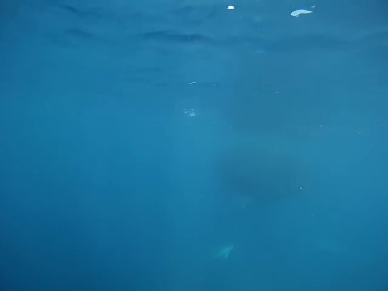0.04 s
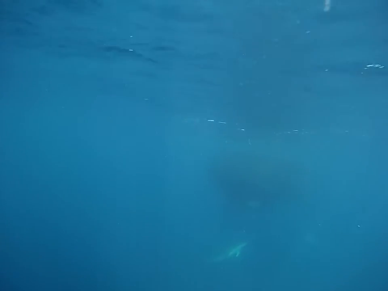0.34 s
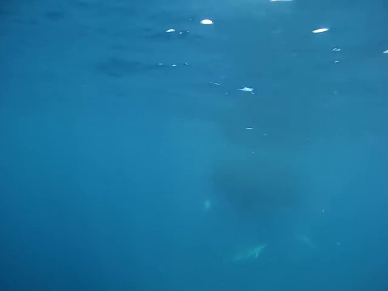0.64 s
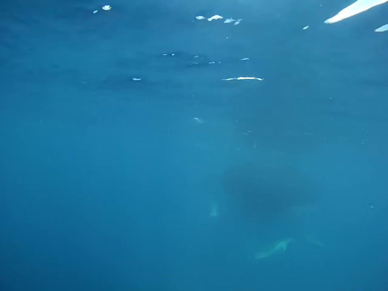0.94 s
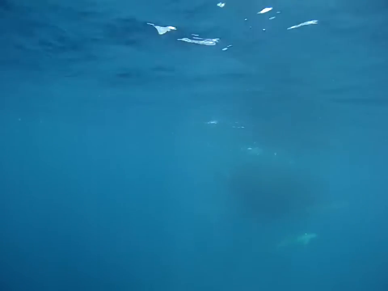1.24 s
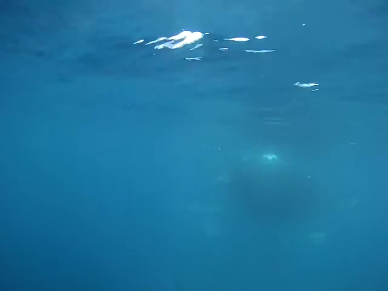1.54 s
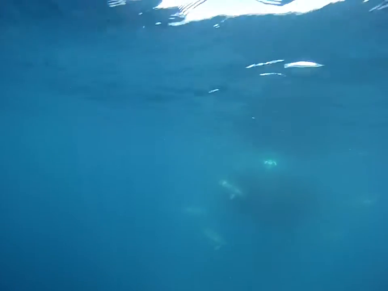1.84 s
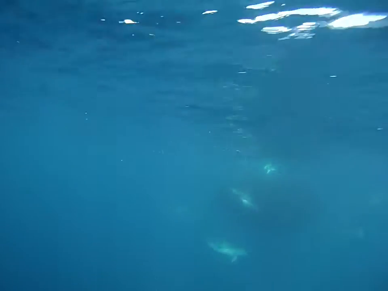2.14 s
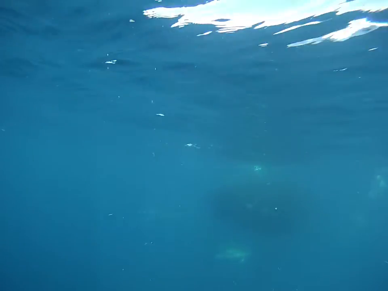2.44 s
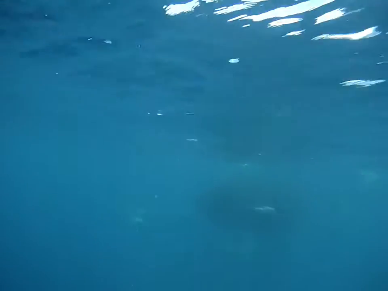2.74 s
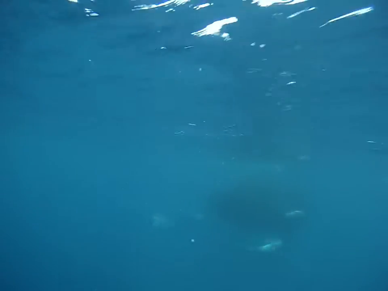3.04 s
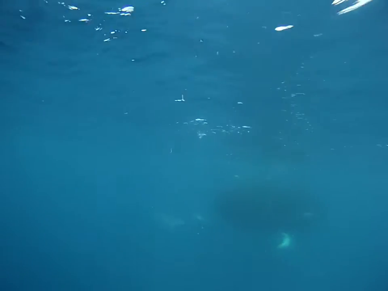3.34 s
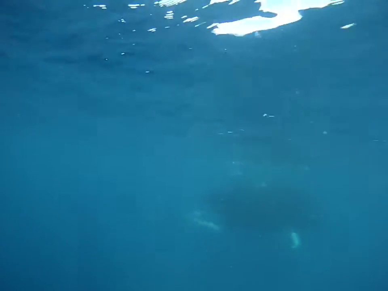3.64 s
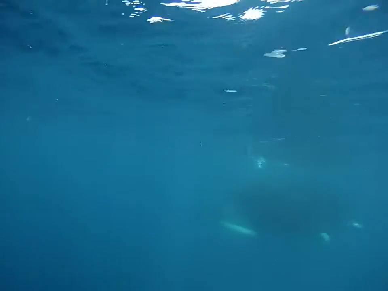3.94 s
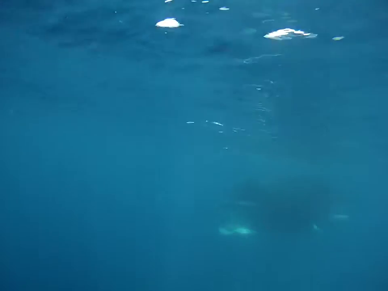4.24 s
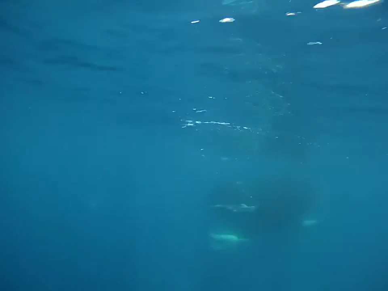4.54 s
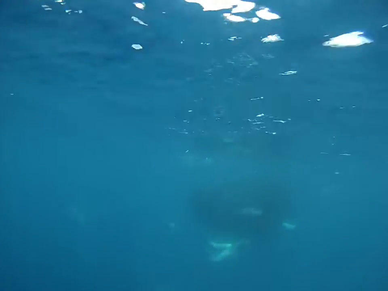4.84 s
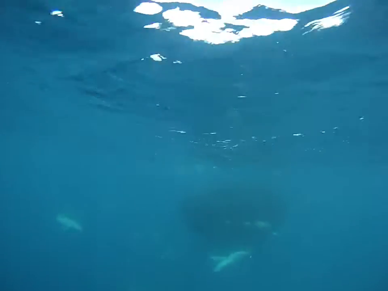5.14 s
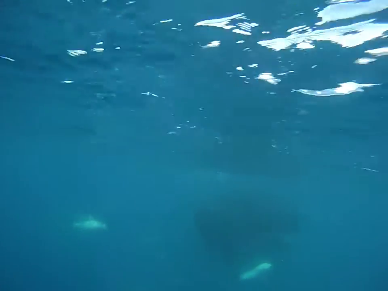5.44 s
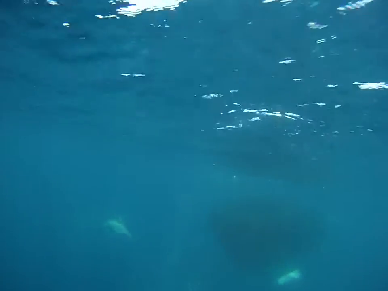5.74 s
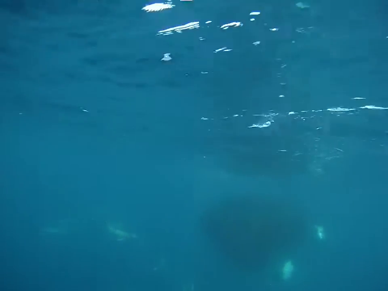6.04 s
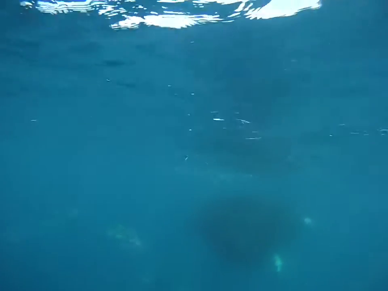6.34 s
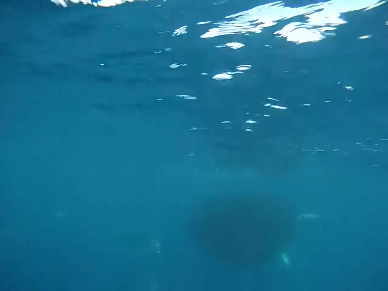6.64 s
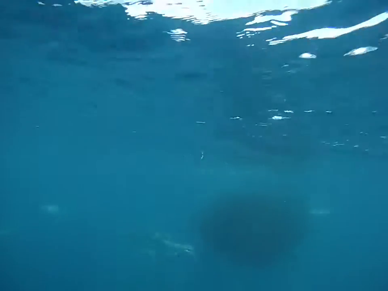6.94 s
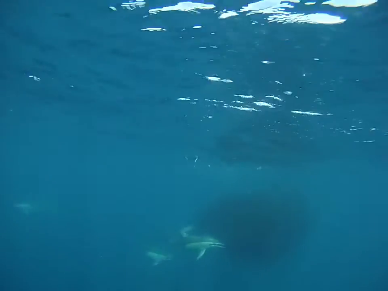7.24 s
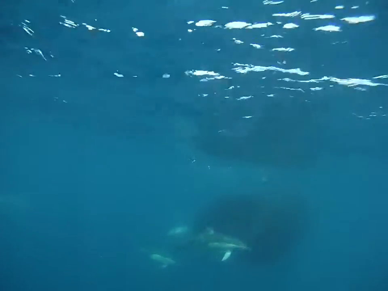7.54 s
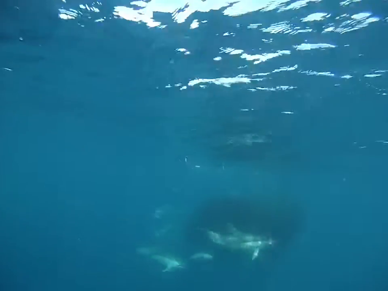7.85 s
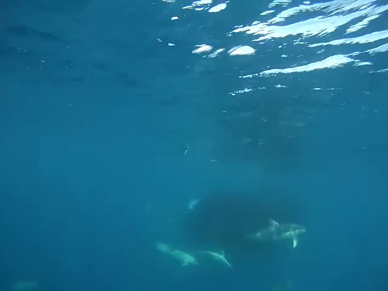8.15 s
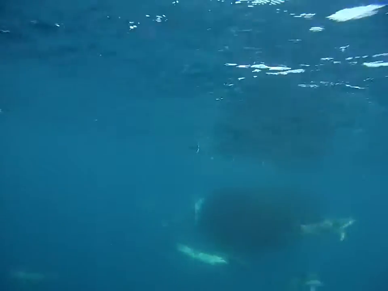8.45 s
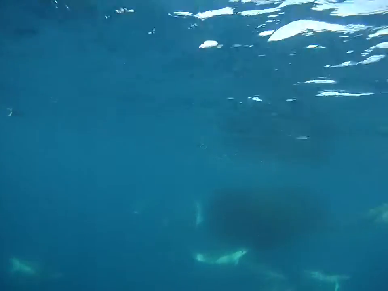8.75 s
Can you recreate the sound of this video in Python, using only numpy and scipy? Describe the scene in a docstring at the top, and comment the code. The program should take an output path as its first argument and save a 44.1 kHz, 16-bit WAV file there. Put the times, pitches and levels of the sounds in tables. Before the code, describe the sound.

Underwater, a boat engine rumbles and clatters as bubbles plop, dolphins faintly whistle and click, and a hiss sets in near the end.

```python
"""Under the sea, two boat engines idle, knocking through the hull, while tiny far-off bubbles fizz.
First, bubbles plop and gurgle near a camera housing, and a passing dolphin gives one long whistle.
From about 1 s the dolphins send out sonar clicks; then come short whistles, squeals, a squawk and
buzzes (clicks so fast that they blend). At 7.4 s a loud hiss sets in at once, most likely a propeller
starting to churn the water, and a few sharp cracks follow."""
import sys
import numpy as np
from scipy import signal
from scipy.fft import rfft, irfft
from scipy.io import wavfile
from scipy.ndimage import uniform_filter1d

SR = 44100
rng = np.random.default_rng(int(sys.argv[2]) if len(sys.argv) > 2 else 0)


def materialize(psi):
    """Save the field psi as 16-bit PCM at rate SR to the path in sys.argv[1].

    A 1-D psi becomes a single channel; in a 2-D psi each row is a channel.
    """
    bounded = np.clip(np.atleast_2d(psi).T, -1, 1)
    quanta = np.round(bounded * 32767).astype(np.int16)
    wavfile.write(sys.argv[1], SR, quanta)


N = 396900
TIME = np.arange(N) / SR

# Levels in the tables are relative: the functions turn them up or down further.
# How loud the far fizz, engine clatter, low rumble and near gurgle are as time goes on.
# Each row: time in seconds, level in dB.
FIZZ_LEVEL = [(1.5, -55), (2.4, -57), (3.1, -53.5), (5.55, -55.5), (6.1, -54), (7.2, -57.5)]
CLATTER_LEVEL = [(0.0, -28), (1.73, -28.5), (2.15, -32), (3.18, -29), (7.24, -31.5), (7.79, -29.5)]
RUMBLE_LEVEL = [(0.0, -37), (1.7, -34.5), (2.2, -39.5), (2.78, -33), (3.55, -40.5), (4.15, -33.5),
                (4.8, -37), (5.5, -33), (6.3, -38), (7.55, -35), (9.0, -35.5)]
GURGLE_LEVEL = [(0, -51), (.8, -65), (1.15, -45), (2.05, -46.5)]
# The colour of each sound: how strong its lows and highs are. Each row: frequency in Hz, level in dB.
FIZZ_COLOUR = [(2500, -3), (3500, 3.5), (4500, -8), (7000, -11), (8600, -16.5), (10200, -12.5),
               (13000, -21), (15500, -30)]
HULL_COLOUR = [(140, -17), (250, -13), (400, -7), (540, -7), (640, 2), (780, -15), (900, -16), (1060, -30),
               (1300, -26), (1530, -23), (1800, -27.5), (2300, -37), (4500, -66.5)]
RUMBLE_COLOUR = [(16, -15.5), (30, 2), (40, -6), (50, 5), (62, -8), (74, -3), (90, -12.5), (130, -25)]
CRACK_COLOUR = [(3000, 12), (7000, 3), (15000, -44)]
CHURN_COLOUR = [(1050, -7.5), (1300, 8.5), (2000, 4), (2400, -7.5), (2900, -6.5), (3200, 3.5), (3600, 3.5),
                (4500, -10), (7100, -8.5), (8700, -15), (9800, -11), (10700, -26), (13300, -35),
                (14300, -30), (15500, -39)]
SONAR_COLOUR = [(3000, -32), (7000, -10.5), (8700, -11.5), (10200, 1.5), (12500, -2), (14000, -15)]
BUZZ_COLOUR = [(2500, -17), (4000, 2), (4900, -4), (7200, 5), (8600, -8), (10200, 4.5), (14000, -7)]
SQUAWK_COLOUR = [(1900, 19.5), (2600, 3), (4600, -1), (5800, 6), (6450, -9), (7100, 5), (8200, -16),
                 (10500, -10)]
WHISTLE_COLOUR = [(6000, -5.5), (7200, 10), (8700, -5), (10300, 4), (11500, -10), (12800, -2)]  # the housing favours some pitches
# Narrow bands that the hull and the housing boost or cut.
# Each row: centre in Hz, width in Hz, boost in dB (below 0 cuts).
HULL_BANDS = [(253.7, 29.3, 6.5), (657, 39, 2), (1285, 99, 10), (1532, 41, -20), (2015, 46, 11)]
HOUSING_BANDS = [(1587, 67, -28), (3970, 170, 4), (4800, 110, -2), (5150, 330, 7.5), (6230, 1000, -12),
                 (6900, 1350, 13), (8650, 440, -16)]
# The two engines. Each row: firings per second, level in dB.
ENGINES = [(50.6, 0), (47.8, -4)]
# Sharp cracks in the water. Each row: time in seconds, peak level in dB.
CRACKS = [(.0613, -40), (1.4222, -40), (7.68, -24), (7.921, -23), (8.116, -27), (8.5053, -26)]
# Bubbles that plop, bubbles that snap as they pinch off, and water thumping the housing.
# Each row: start in seconds, starting pitch in Hz, peak level in dB.
PLOPS = [(.061, 8440, -46), (.096, 846, -11.5), (.113, 1890, -23.5), (.115, 1324, -20), (.977, 706, -10.5),
         (.996, 830, -13), (1.0145, 1897, -10.5), (1.037, 995, -19.5), (1.052, 2900, -37),
         (1.1348, 1300, -16), (1.136, 830, -17.5), (1.141, 2570, -33), (1.499, 8000, -50),
         (1.794, 870, -18.5)]
SNAPS = [(.1795, 2920, -36), (.8659, 3300, -28.5), (1.013, 2300, -21.5), (1.124, 2650, -27),
         (1.2934, 6730, -46), (1.723, 2750, -33), (1.7921, 1410, -10), (1.864, 2210, -22.5),
         (3.292, 2630, -30), (3.394, 2640, -25)]
THUMPS = [(.31, 52.5, -9.5), (.346, 52, -12), (.976, 266, -10), (.977, 810, 0), (5.302, 190, -12.5),
          (5.303, 63.6, -4.5), (5.345, 60, -11)]
# Runs of sonar clicks. Each row: first and last click in seconds, average clicks per second,
# speed-up (below 0 slows down), moment of best aim in seconds, peak level in dB.
SONAR_RUNS = [(0.933, 1.425, 22.2, 0.00029, 1.57, -40), (1.456, 1.686, 12.8, -0.28, 1.5, -40),
              (2.852, 3.108, 15.6, -0.12, 2.98, -48), (4.567, 5.343, 19.5, -0.064, 5, -48),
              (5.3875, 6.305, 24.1, -.122, 5.7, -43.5), (5.787, 6.4293, 21.8, -.165, 6.1, -44),
              (6.499, 6.853, 25.4, 0.13, 6.63, -43), (6.914, 7.369, 19.7, -0.073, 7.0, -51)]
# Dolphin buzzes. Each row: start and length in seconds, clicks per second at the start, middle
# and end, level in dB.
BUZZES = [(3.87, .53, 695, 666, 655, -69.5), (4.379, 0.3, 392, 550, 627, -68.5),
          (7.079, 0.46, 322, 526, 660, -67.5)]
# Low squeals and short whistles. Each row: start and length in seconds, base pitch in Hz at the
# start, middle and end, level in dB.
SQUEALS = [(2.856, .33, 1775, 2080, 1750, -58), (3.17, .3, 1760, 2055, 2075, -57),
           (3.92, .45, 1945, 2002, 1935, -55.5), (5.975, .085, 1920, 1990, 2070, -53),
           (7.29, .23, 1900, 2110, 2090, -55.5)]
SHORT_WHISTLES = [(2.452, .045, 10300, 9150, 11200, -62), (2.573, 0.091, 9100, 8500, 10600, -55.5),
                  (6.658, 0.47, 9850, 11750, 12200, -65)]
# The rise and fall of the long whistle. Each row: time in seconds, pitch in Hz.
LONG_WHISTLE_PITCH = [(.16, 7850), (.34, 8850), (.45, 10400), (.56, 12500), (.66, 13000), (.77, 12100),
                      (.92, 8200), (1.0, 7250), (1.09, 6700)]


def from_db(db):
    """Turn decibels into a number to multiply by."""
    return 10 ** (np.asarray(db) / 20)


def rms_one(x):
    """Scale a signal so that its average strength (rms) is 1."""
    return x / np.sqrt(np.mean(x ** 2) + 1e-20)


def in_time(rows):
    """Join rows of (seconds, value) with straight lines, giving a value at every sample."""
    return np.interp(TIME, *np.transpose(rows))


def noise():
    """White noise: an even hiss."""
    return rng.standard_normal(N)


def drift(per_s):
    """A random wobble of strength 1 that heads for a new value per_s times a second."""
    targets = rng.standard_normal(size=12000)
    return rms_one(np.interp(TIME * per_s, np.arange(len(targets)), targets))


def arch(start, length, fade):
    """A rounded rise and fall; the smaller the fade, the squarer."""
    return np.maximum(1 - (2 * (TIME - start) / length - 1) ** 2, 0) ** fade


def coloured(x, colour, bands=()):
    """Filter a sound with a broad colour plus narrow boosts and cuts."""
    hz = np.maximum(np.fft.rfftfreq(N, 1 / SR), 1)
    points, levels = np.transpose(colour)
    db = np.interp(np.log(hz), np.log(points), levels)
    octaves_outside = np.abs(np.log2(hz / np.clip(hz, points[0], points[-1])))
    db -= 24 * octaves_outside
    for centre, width, boost in bands:
        db += boost / (1 + (2 * (hz - centre) / width) ** 2)
    # Make the filter ring after a click, not before it (minimum phase).
    cepstrum = irfft(np.log(from_db(db)), N)
    cepstrum[1:N // 2] *= 2
    cepstrum[N // 2 + 1:] = 0
    return irfft(rfft(x) * np.exp(rfft(cepstrum)), N)


def pulses(per_s):
    """One pulse per cycle, shared between the two nearest samples."""
    cycles = np.cumsum(per_s) / SR
    fired = np.diff(np.floor(cycles), prepend=0)
    early_share = fired * (cycles % 1) / (per_s / SR)
    return fired - early_share + np.roll(early_share, -1)


def ticks(events, colour, bands=()):
    """One filtered click for each row of (seconds, peak dB)."""
    clicks = np.zeros(N)
    for start, db in events:
        clicks[round(start * SR)] = from_db(db)
    sound = coloured(clicks, colour, bands)
    return sound * clicks.max() / np.abs(sound).max()


def sea_echoes(x, echo_db, spread_s, count=10):
    """The rippled surface and the hull send back a scatter of weak, quick echoes."""
    out = x.copy()
    for k, (place, sign) in enumerate(zip(rng.random(count), rng.choice([-1, 1], count))):
        share = (k + place) / count
        lag = 1 + int(share * spread_s * SR)
        out[lag:] += sign * from_db(echo_db) * (1 - share) * x[:-lag]
    return out


def wave_echoes(x, echo_db, lag_s, sway_s, per_s=5, count=3):
    """The moving surface mirrors the sound upside down, so its colour shifts with the waves."""
    lags = (lag_s * (k + rng.random()) + sway_s * drift(per_s) for k in range(count))
    return x - from_db(echo_db) * sum(np.interp(TIME - lag, TIME, x) for lag in lags)


def fizz(grain_db=6.5):
    """Countless far bubbles merge into a faint crackling hiss."""
    crackle = noise() * from_db(grain_db * noise())
    return from_db(in_time(FIZZ_LEVEL) - 6.5) * rms_one(coloured(crackle, FIZZ_COLOUR))


def engine(per_s, knock_db=-6.5, rattle_db=-2.5, puff_db=-4, uneven_db=2.5, puff_s=0.0045, cylinders=6):
    """Each firing knocks and puffs; the valves repeat their rattle once per round of the cylinders."""
    firings = TIME * per_s
    cylinder = firings.astype(int) % cylinders
    strength_db = uneven_db * (rng.standard_normal(cylinders)[cylinder] + .5 * noise())
    knocks = rms_one(pulses(np.full(N, per_s)) * from_db(strength_db))
    puffs = rms_one(noise() * np.exp(-(firings % 1) / per_s / puff_s))
    round_samples = round(cylinders * SR / per_s)
    noise_loop = irfft(np.exp(2j * np.pi * rng.random(round_samples // 2 + 1)), round_samples)
    rattle = rms_one(np.resize(noise_loop, N))
    return from_db(knock_db) * knocks + from_db(puff_db) * puffs + from_db(rattle_db) * rattle


def boat(wash_db=1.5, hum_db=-7.5):
    """Engines and washing water sound through the hull; two close firing tones throb over the rumble."""
    engines = sum(from_db(db) * engine(per_s) for per_s, db in ENGINES)
    clatter = rms_one(coloured(engines + from_db(wash_db) * noise(), HULL_COLOUR, HULL_BANDS))
    hum = sum(from_db(db) * np.sin(2 * np.pi * (per_s * TIME + 0.16 * drift(3.5)))
              for per_s, db in ENGINES)
    low_noise = rms_one(coloured(noise(), RUMBLE_COLOUR))
    rumble = rms_one(low_noise + from_db(hum_db) * rms_one(hum))
    clatter *= from_db(in_time(CLATTER_LEVEL) + 1.09)
    rumble *= from_db(in_time(RUMBLE_LEVEL) + 2.5)
    return clatter + rumble


def cracks():
    """Sharp cracks in the water, coloured by the housing and followed by echoes."""
    return sea_echoes(ticks(CRACKS, CRACK_COLOUR, HOUSING_BANDS), echo_db=-5.5, spread_s=0.0042)


def bubble(hz, ring_s, attack_cycles, rise=0.19):
    """A bubble rings at a pitch set by its size, going higher as it nears the surface."""
    t = TIME[:SR // 3]
    pitch = hz * (1 + rise * np.minimum(t / ring_s, 2))
    cycles = np.cumsum(pitch) / SR
    fade_in = 1 - np.exp(-(cycles / attack_cycles) ** 2)
    return from_db(-60 * t / ring_s) * fade_in * np.sin(2 * np.pi * cycles)


def gurgle(per_s, low_hz, high_hz, ring_cycles=36, uneven_db=4, sizes=12):
    """Small bubbles ring at random moments; the smaller they are, the higher and weaker."""
    births = (rng.random(N) < per_s / SR) * from_db(uneven_db * noise())
    size = rng.integers(0, sizes, N)
    out = np.zeros(N)
    for k, hz in enumerate(np.geomspace(low_hz, high_hz, sizes)):
        ring = bubble(hz, ring_cycles / hz, attack_cycles=2.7)
        out += signal.oaconvolve(births * (size == k), ring)[:N] * (low_hz / hz) ** 2
    active = (TIME > GURGLE_LEVEL[0][0]) & (TIME < GURGLE_LEVEL[-1][0])
    return uniform_filter1d(1.0 * active, size=200) * from_db(in_time(GURGLE_LEVEL)) * rms_one(out)


def rings(rows, ring_s_at, attack_cycles):
    """One ring per row; ring_s_at turns its pitch into the seconds it takes to fade by 60 dB."""
    out = np.zeros(N)
    for start, hz, db in rows:
        ring = from_db(db) * bubble(hz, ring_s_at(hz), attack_cycles)
        at = round(start * SR)
        out[at:at + len(ring)] += ring
    return out


def splashes(rows, splash_db=-5.0, fade_s=0.026):
    """As its neck closes, each bubble throws out a brief splash of noise around its own pitch."""
    out, t = np.zeros(N), TIME[:SR // 20]
    for start, hz, db in rows:
        band = signal.butter(2, [.35 * hz, 1.05 * hz], "band", fs=SR, output="sos")
        burst = rng.standard_normal(len(t)) * from_db(-60 * t / fade_s)
        splash = signal.sosfilt(np.vstack([band, band]), burst)
        at = round(start * SR)
        out[at:at + len(t)] += from_db(db + splash_db) * splash / np.abs(splash).max()
    return out


def near_bubbles(plop_s=0.044, snap_cycles=22):
    """Round plops and sharp snaps, each with its splash and echoes."""
    plops = rings(PLOPS, lambda hz: plop_s, attack_cycles=1.8)
    snaps = rings(SNAPS, lambda hz: snap_cycles / hz, attack_cycles=1.6)
    return from_db(2) * sea_echoes(plops + snaps + splashes(PLOPS + SNAPS), echo_db=-14.5, spread_s=.018)


def thumps(ring_cycles=7.9):
    """Water bumps the housing with dull thumps and knocks."""
    return from_db(-1) * rings(THUMPS, lambda hz: ring_cycles / hz, attack_cycles=0.69)


def propeller(start_s=7.402, build_s=0.37, bite_s=7.421, bite_width_s=0.0092,
              turns_per_s=11.13, blades=4):
    """Tiny cavities collapse in a hiss, surging with each blade, in clusters that repeat every turn."""
    built = np.clip((TIME - start_s) / build_s, 0, 1)
    bite = np.exp(-((TIME - bite_s) / bite_width_s) ** 2)  # one short burst as the blades catch
    level_db = -39 - 7 * (1 - built) + 11.5 * bite
    turning = uniform_filter1d(1.0 * (TIME > start_s), size=800)
    turns = TIME * turns_per_s
    steps = 64  # random strengths in one turn
    pattern = rms_one(rng.standard_normal(steps))
    clusters = np.interp(turns * steps, np.arange(steps), pattern, period=steps)
    surge_db = 1.9 * np.cos(2 * np.pi * blades * turns) + 2.8 * clusters + 1.2 * drift(120)
    crackle = noise() * from_db(6 * noise() + surge_db)
    hiss = wave_echoes(crackle, echo_db=-11, lag_s=.003, sway_s=0.000509)
    return turning * from_db(level_db) * rms_one(coloured(hiss, CHURN_COLOUR, HOUSING_BANDS))


def sonar(off_aim_loss_db=6, uneven_db=1.5):
    """Clicks mostly too high to hear leave tiny ticks, loudest as the dolphin's beam sweeps past."""
    events = []
    for first, last, per_s, speed_up, aim_s, db in SONAR_RUNS:
        length = last - first
        progress = np.linspace(0, 1, 1 + round(per_s * length))
        times = first + length * (progress + speed_up * progress * (1 - progress))
        aimed_db = db - off_aim_loss_db * np.abs(times - aim_s) / length
        events += zip(times, aimed_db + uneven_db * rng.standard_normal(len(times)))
    return wave_echoes(ticks(events, SONAR_COLOUR), echo_db=-12.5, lag_s=0.000166, sway_s=.00005)


def call(start, length, start_hz, middle_hz, end_hz, fade, bend_width=.26):
    """Pitch and loudness of one call: a slide with a bend in the middle, fading in and out."""
    progress = np.clip((TIME - start) / length, 0, 1)
    bend = (middle_hz - (start_hz + end_hz) / 2) * np.exp(-((progress - .5) / bend_width) ** 2)
    return start_hz + (end_hz - start_hz) * progress + bend, arch(start, length, fade)


def buzz(row, jitter=0.011, wander=0.009, uneven_db=2.5, db_per_octave=3):
    """Hundreds of clicks a second blend into a rough, sliding tone, louder as they quicken."""
    start, length, start_hz, middle_hz, end_hz, db = row
    per_s, loudness = call(start, length, start_hz, middle_hz, end_hz, fade=0.23)
    level_db = db + db_per_octave * np.log2(per_s / middle_hz)
    wobble = 1 + jitter * drift(400) + wander * drift(9.3)
    clicks = pulses(per_s * wobble) * from_db(uneven_db * noise())
    return loudness * from_db(level_db) * rms_one(coloured(clicks, BUZZ_COLOUR))


def squawk(start_s=3.445, length_s=0.057, db=-45.5, per_s=645, jitter=0.03):
    """A short burst of unevenly spaced clicks makes a rasp."""
    clicks = pulses(per_s * np.exp(jitter * drift(370)))
    return arch(start_s, length_s, fade=0.4) * from_db(db) * rms_one(coloured(clicks, SQUAWK_COLOUR))


def whistle(hz, db, waver=0.0047, wander=.003, fading_db=3.5):
    """A wavering tone that fades in and out as its paths through the water shift."""
    level_db = db - 5.5 + np.interp(hz, *np.transpose(WHISTLE_COLOUR))
    hz = hz * (1 + waver * drift(370) + wander * drift(30))
    return from_db(level_db + fading_db * drift(90)) * np.sin(2 * np.pi * np.cumsum(hz) / SR)


def squeal(row, third_db=-11.0):
    """A low, hoarse whistle, heard only at two and three times its base pitch."""
    *shape, db = row
    hz, loudness = call(*shape, fade=0.21)
    return loudness * (whistle(2 * hz, db) + whistle(3 * hz, db + third_db))


def short_whistle(row):
    """A whistle that slides with a single bend."""
    *shape, db = row
    hz, loudness = call(*shape, fade=0.21)
    return loudness * whistle(hz, db)


def long_whistle(rasp=0.61, break_start_s=.597, break_end_s=.643, drop_hz=550):
    """The voice rises and falls, rasping more when high and breaking downwards briefly near the top."""
    hz = in_time(LONG_WHISTLE_PITCH)
    first, last = LONG_WHISTLE_PITCH[0][0], LONG_WHISTLE_PITCH[-1][0]
    strain = (hz - hz.min()) / np.ptp(hz)
    breaking = (TIME > break_start_s) & (TIME < break_end_s)
    hz = uniform_filter1d(hz, size=2400) - drop_hz * breaking
    tone = arch(first, last - first, fade=0.37) * whistle(hz, db=-59.5)
    return tone * (1 + rasp * strain * drift(420))


def scene():
    """Mix the nearby boat and bubbles with the dolphins farther off, in one channel."""
    whistles = long_whistle() + sum(short_whistle(row) for row in SHORT_WHISTLES)
    calls = whistles + sum(squeal(row) for row in SQUEALS) + sum(buzz(row) for row in BUZZES)
    dolphins = sea_echoes(calls, echo_db=-18.0, spread_s=0.036) + sonar() + squawk()
    tiny_bubbles = from_db(-32.5) * gurgle(per_s=13, low_hz=6550, high_hz=10000)
    water = near_bubbles() + thumps() + gurgle(per_s=53, low_hz=844, high_hz=2360) + tiny_bubbles
    return (cracks() + boat() + fizz() + propeller() + water + dolphins)[None]


def record(dry, cutoff_hz=15650):
    """Cut away the very highest treble steeply."""
    return signal.sosfilt(signal.ellip(10, .1, 90, cutoff_hz, fs=SR, output="sos"), dry)


dry = scene()
out = record(dry)
materialize(out)
```